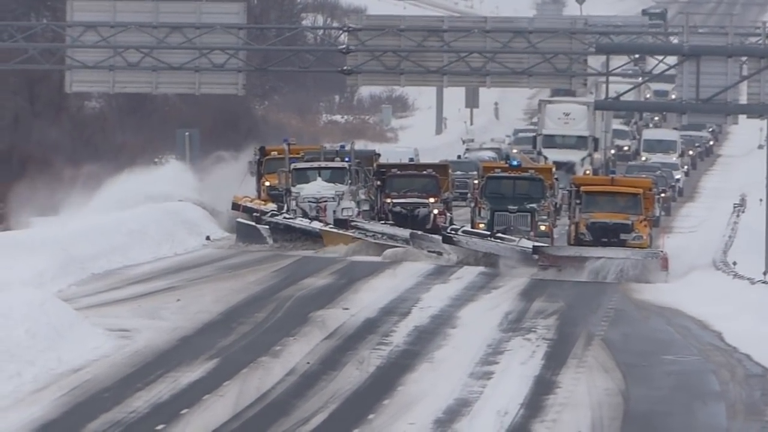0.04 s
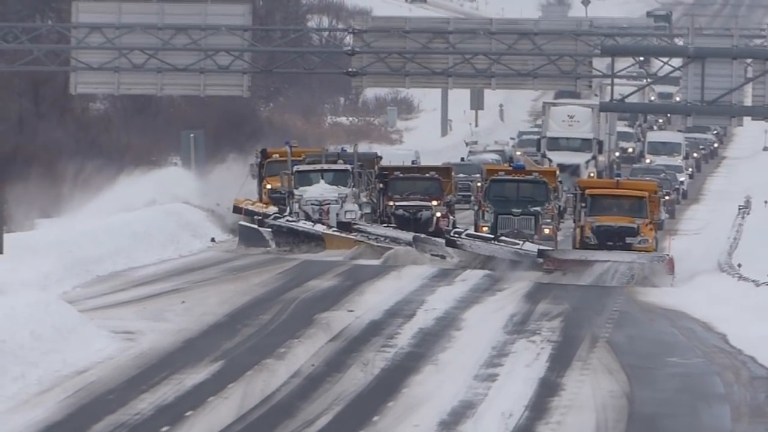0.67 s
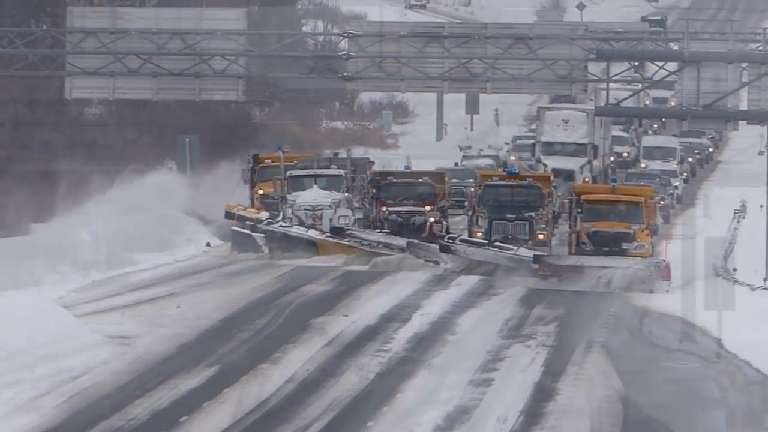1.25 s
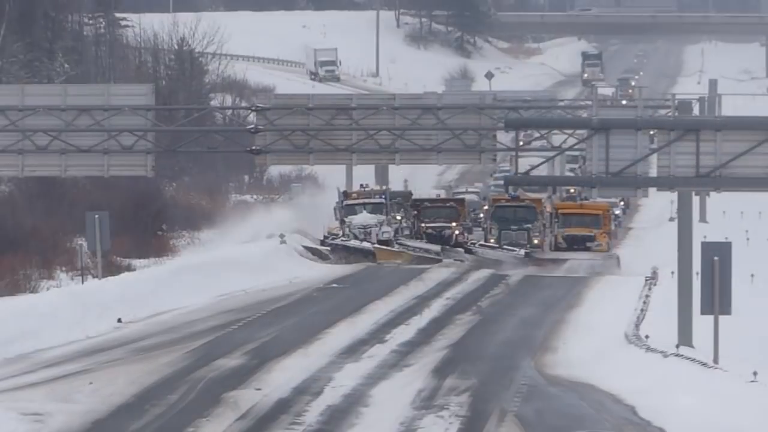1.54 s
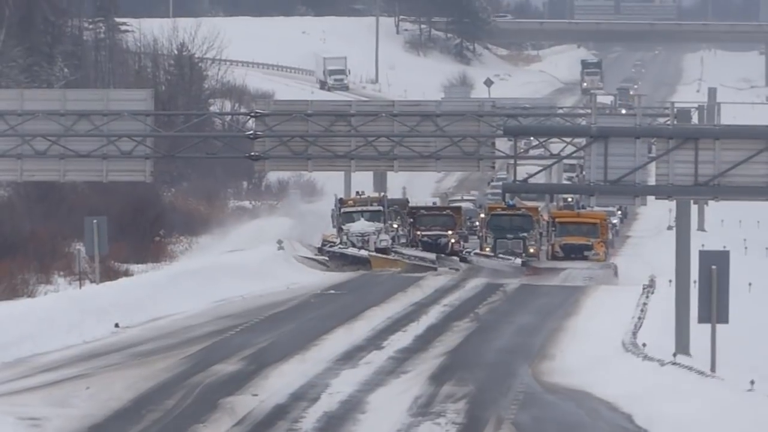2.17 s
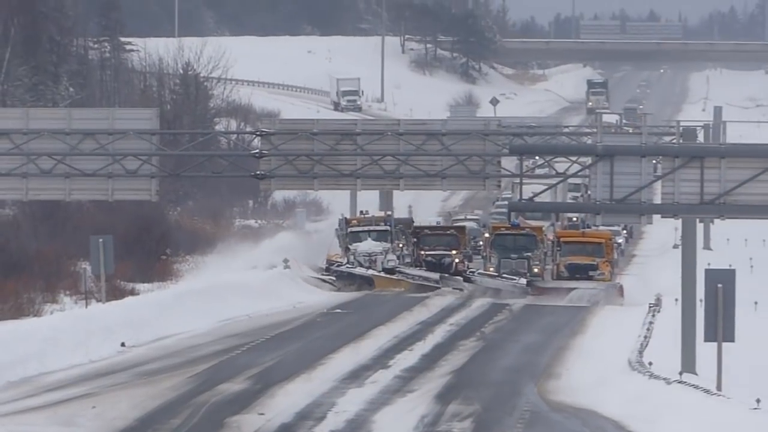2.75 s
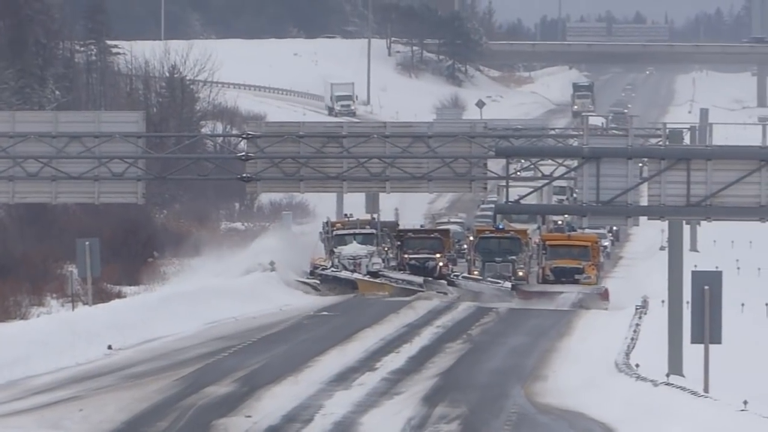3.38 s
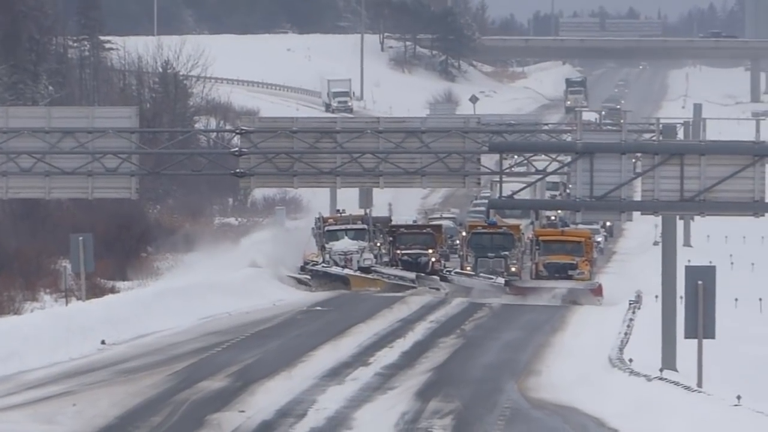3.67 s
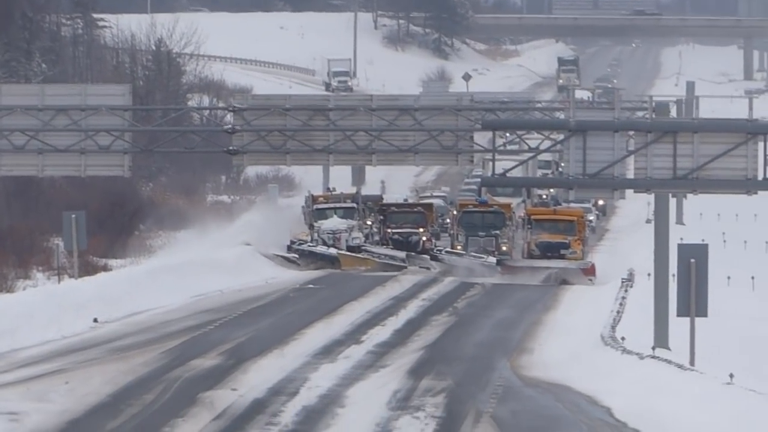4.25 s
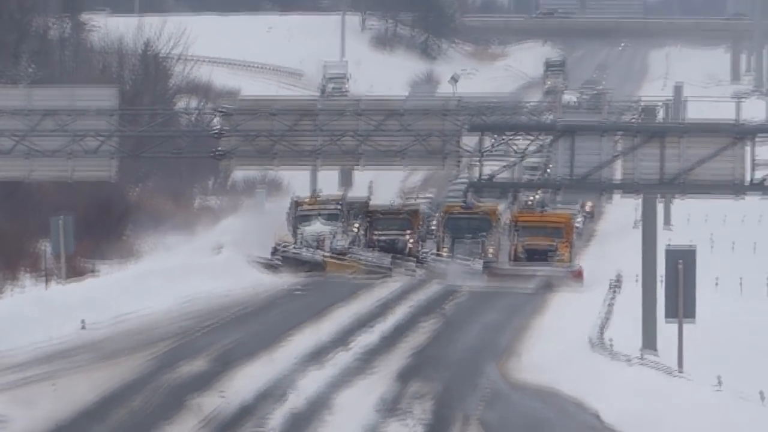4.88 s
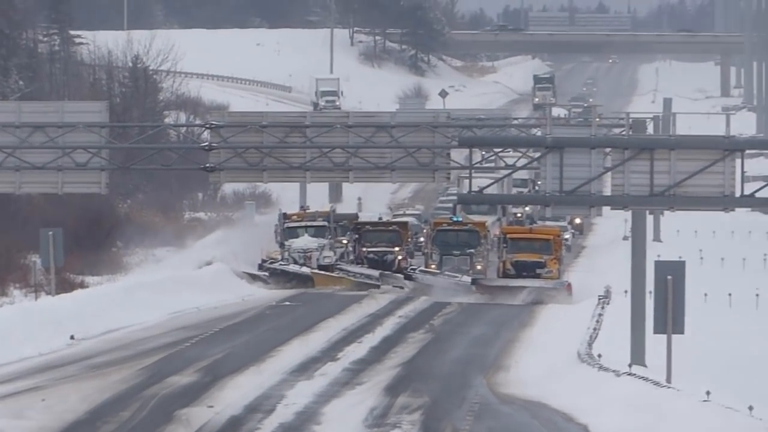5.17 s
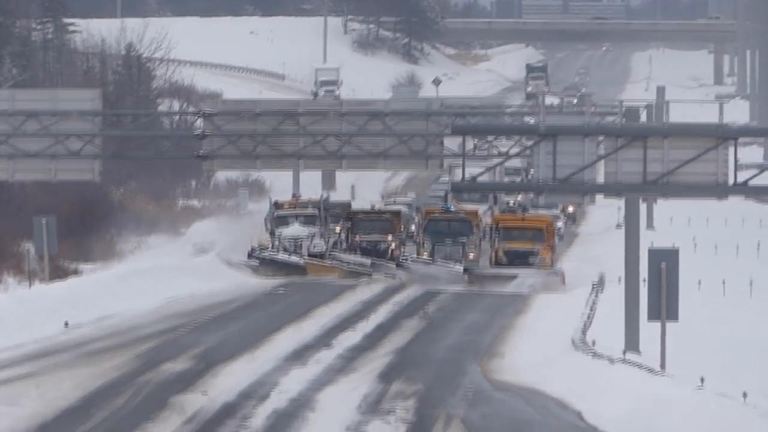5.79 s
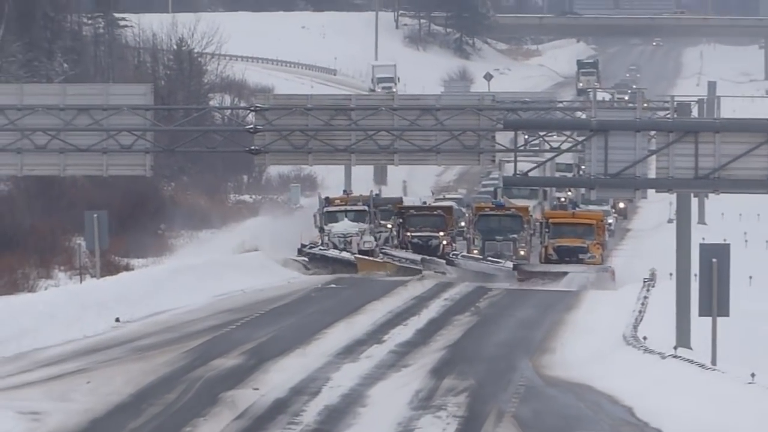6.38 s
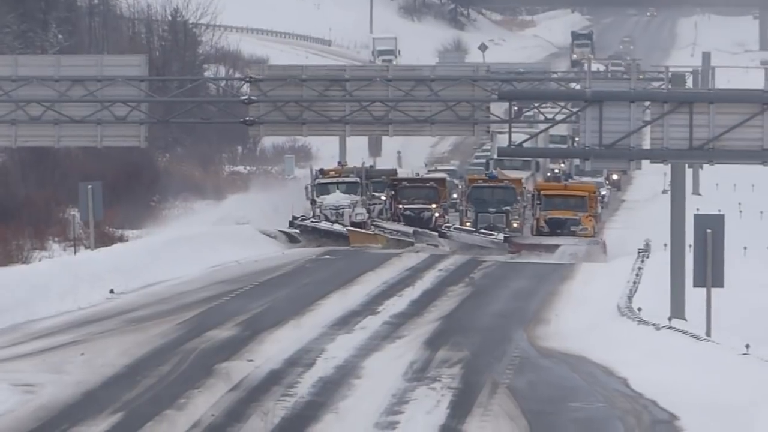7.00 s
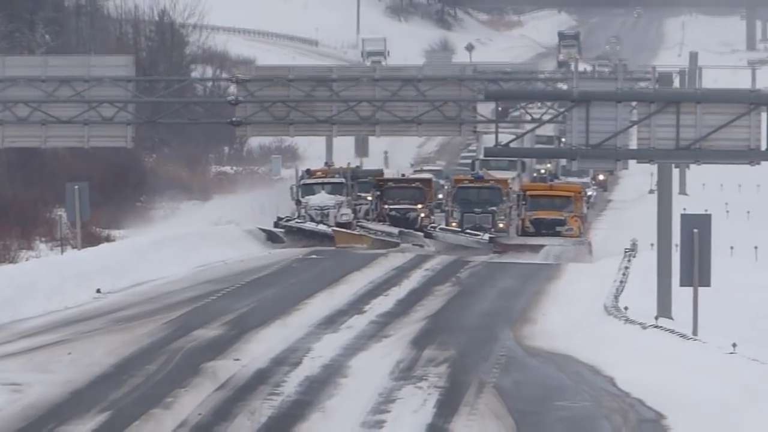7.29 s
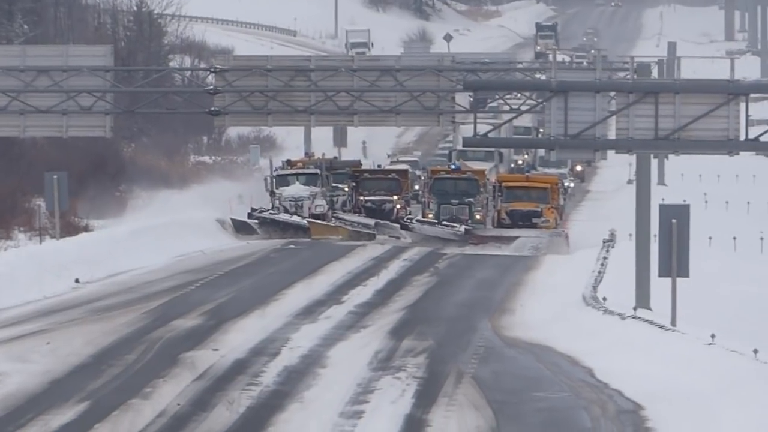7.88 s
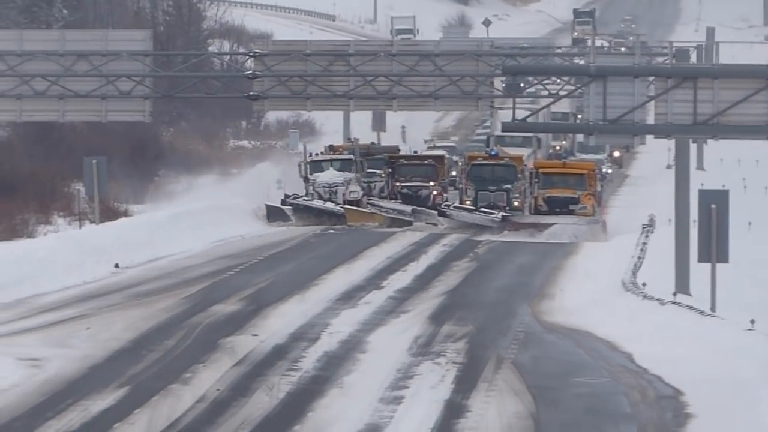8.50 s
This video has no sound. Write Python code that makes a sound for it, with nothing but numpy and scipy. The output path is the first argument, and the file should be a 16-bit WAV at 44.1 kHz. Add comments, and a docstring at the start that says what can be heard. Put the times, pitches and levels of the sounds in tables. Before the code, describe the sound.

Low, fluttering wind buffets a microphone outdoors by a highway, rasping and crackling in the stronger gusts and dropping out in short lulls. Before it sets in, far-off snowploughs are heard briefly, engines roaring and blades scraping the road, followed by a short rush, with quick electrical clicks over both. Faint distant traffic carries on under the wind, which eases near the end.

```python
"""A diesel roar and the scrape of blades come first: far-off snowploughs creeping along a winter highway. Sharp
ticks dot these first two seconds, while the roar gives way to a brighter rush. The road then falls back behind
gusty wind. Eddies buffet the microphone with low, fluttering pressure, and in the hardest gusts the flow tears
into a rasp and a crackle. Distant traffic and a faint hiss lie beneath."""
import sys
import numpy as np
from scipy import signal
from scipy.fft import rfft, irfft, next_fast_len
from scipy.io import wavfile
from scipy.ndimage import uniform_filter1d

SR = 44100
rng = np.random.default_rng(int(sys.argv[2]) if len(sys.argv) > 2 else 0)


def waveform_to_disk(signal):
    """Save audio, clipped to [-1, 1], as 16-bit WAV at the path in sys.argv[1]."""
    frames = np.transpose(np.atleast_2d(signal))
    scaled = np.clip(frames, -1, 1) * 32767
    samples = np.round(scaled).astype(np.int16)
    wavfile.write(sys.argv[1], SR, samples)


N = 381024
TIME = np.arange(N) / SR

# The ploughs' loudness. Each row: time in seconds, relative levels of roar and of blade scrape in dB.
PLOUGH_LEVELS = [(0.0, -26, -35), (0.02, -26, -34), (0.594, -24, -32), (0.676, -23.5, -36.5),
                 (0.834, -23.5, -31), (0.882, -23, -38), (1.032, -28.5, -40), (1.22, -25, -35)]
# Loudness of the rush, first gust, breeze and far traffic. Each row: time in seconds, relative level in dB.
RUSH_LEVELS = [(1.24, -39), (1.37, -37), (1.52, -40), (1.8, -37), (1.84, -41.5), (2.04, -39.5)]
FIRST_GUST_LEVELS = [(1.2, -34), (1.248, -23), (1.358, -37.5), (1.418, -21.5), (1.552, -34), (1.588, -23),
                     (1.728, -30), (1.85, -27)]
BREEZE_LEVELS = [(1.8, -24), (2.6, -26.5), (3.35, -28.5), (4.3, -31), (4.6, -28), (5.35, -29), (6.0, -29),
                 (6.12, -33), (7.1, -26), (7.6, -32), (8.15, -36), (8.3, -39), (8.64, -37)]
TRAFFIC_LEVELS = [(2.06, -46.5), (2.5, -53.5), (2.8, -47), (3.3, -54), (3.88, -44.5), (4.05, -50.5),
                  (4.5, -48), (5.0, -52.5), (6.6, -54), (7.0, -65.5), (8.33, -52), (8.64, -57.5)]
# Engine and blade resonances. Each row: centre in Hz, width in Hz, relative level in dB.
PLOUGH_MODES = [(117, 34, -45), (151, 19, -45.5), (371, 22, -33), (441, 22, -35.5), (975, 37, -40.5)]
TRAFFIC_MODES = [(134, 26, 5), (246, 22, 7.5), (450, 13, 2), (683, 20, 3.5), (2460, 25, -14.5)]
# Gusts. Each row: start in seconds, length in seconds, relative levels of pressure and of torn air in dB.
GUST_EVENTS = [(1.8, 0.18, -19.5, -74), (1.94, 0.12, -23, -66), (2.15, 0.07, -22.5, -51),
               (2.198, 0.096, -22.5, -42.5), (2.352, 0.082, -22, -46), (2.436, 0.11, -24.5, -47.5),
               (2.628, 0.051, -22, -67), (2.694, 0.055, -21, -54), (2.838, 0.16, -23, -59),
               (2.947, 0.098, -22, -38.5), (3.096, 0.061, -22, -43), (3.178, 0.13, -26, -55),
               (3.412, 0.17, -23, -76), (3.634, 0.033, -35.5, -60), (3.94, 0.084, -23.5, -79),
               (4.06, 0.048, -27.5, -75), (4.152, 0.064, -24, -74), (4.418, 0.019, -26.5, -80),
               (4.625, 0.084, -22.5, -67), (4.712, 0.15, -22.5, -50), (4.892, 0.22, -22.5, -41),
               (5.156, 0.14, -24.0, -61.5), (5.47, 0.075, -21.5, -60), (5.567, 0.032, -20.5, -68),
               (5.685, 0.014, -25.5, -71), (5.802, 0.11, -22.0, -54), (5.91, 0.08, -20.5, -42.5),
               (6.198, 0.078, -25.5, -59), (6.338, 0.016, -20, -61), (6.376, 0.081, -25.0, -60),
               (6.514, 0.19, -26, -63.5), (6.635, 0.13, -21.5, -48), (6.781, 0.11, -32, -53),
               (6.881, 0.072, -25, -45.5), (6.96, 0.11, -27.5, -62), (7.076, 0.012, -18.5, -50),
               (7.18, 0.098, -22.5, -48.5), (7.34, 0.047, -25.5, -48.5), (7.435, 0.13, -24, -51),
               (7.709, 0.058, -27.0, -61), (7.821, 0.092, -29, -64), (8.039, 0.042, -25, -68),
               (8.34, 0.07, -46, -81), (8.476, 0.086, -30, -66), (8.543, 0.038, -22.5, -64)]
# Drops in the breeze. Each row: start in seconds, length in seconds, dip in dB.
BREEZE_LULLS = [(2.1, 0.033, -7), (2.792, .055, -9.5), (3.308, 0.042, -6), (3.672, .265, -19.5),
                (4.115, .03, -16), (4.372, 0.095, -12.5), (5.29, 0.042, -9), (5.609, 0.069, -32),
                (5.715, 0.043, -11), (6.055, 0.045, -9), (7.296, 0.018, -7.5), (7.781, 0.034, -18),
                (7.963, 0.058, -10), (8.181, 0.15, -22), (8.407, 0.04, -11)]
# Slow, deep eddies. Each row: start in seconds, length in seconds, relative level in dB.
DEEP_EDDIES = [(.33, 0.1, -37), (.5, .05, -51), (.61, 0.1, -34.5), (.76, .16, -47), (.98, .08, -66),
               (1.245, .045, -38), (1.33, .72, -42)]
# Hard single eddies, spits of torn air, loud ticks and far blade scrapes.
# Each row: start in seconds, relative peak in dB.
HARD_EDDIES = [(1.811, -15), (1.879, -11), (1.904, -21), (2.065, -12), (2.142, -14.5), (2.351, -18),
               (2.66, -16), (2.711, -17), (2.963, -19.5), (3.628, -21), (3.945, -18), (4.431, -22.5),
               (4.668, -14), (4.752, -17), (5.488, -16), (6.339, -21), (6.734, -18.5), (6.793, -23),
               (6.907, -18), (7.756, -22), (7.829, -21)]
AIR_SPITS = [(2.2288, -24), (2.249, -33), (2.284, -40), (2.7377, -32), (3.034, -35), (3.146, -33),
             (3.235, -34), (4.1998, -35), (4.722, -30), (4.9876, -31), (5.0515, -30), (5.853, -38),
             (5.9774, -33), (6.2302, -35.5)]
LOUD_TICKS = [(0.0489, -37), (0.3407, -31), (0.6325, -27), (0.6738, -34), (0.7157, -28.5), (0.7991, -33),
              (0.8409, -41), (0.8828, -36), (1.007, -41), (1.0493, -33.5), (1.133, -35), (1.2159, -35),
              (1.299, -31.5), (1.3409, -39), (1.3832, -29.5), (1.5494, -31.5), (1.674, -38), (1.7993, -36)]
FAR_SCRAPES = [(2.59, -50), (2.79, -52), (3.36, -53), (3.72, -54), (8.17, -72)]
# How the wind differs between the two microphone ports. Each row: time in seconds, side-to-mid gain in dB.
WIND_WIDTH = [(1.8, -11), (2.05, -7.5), (2.23, -55.5), (2.55, -70), (2.9, -45.5), (3.9, -28.5),
              (4.8, -27.5), (7.0, -20), (8.6, -18)]
# Noise spectra of the sources. Each row: frequency in Hz, relative spectral density in dB.
ROAR_SPECTRUM = [(40, -41), (70, -27), (115, -8), (160, -9), (200, -10), (280, -2.5), (380, -0.5),
                 (520, -1.5), (680, -4), (850, -12.5), (1500, -17), (8000, -95)]
SCRAPE_SPECTRUM = [(150, -43), (600, -21), (1000, 5.5), (1300, 2), (1700, 2.5), (2200, -3.5), (2800, -10),
                   (3800, -18), (5200, -19), (6000, -34), (7500, -56), (15000, -75)]
RUSH_SPECTRUM = [(100, -25), (250, 4.5), (400, 13), (700, 6), (1000, 2.5), (1500, -1), (2300, -6),
                 (3100, -10.5), (4000, -18.5), (5000, -21.5), (7500, -42.5), (10500, -44.5), (15000, -65)]
WIND_SPECTRUM = [(30, -46), (55, -33.5), (85, -20.5), (130, -4.5), (200, 1.5), (300, 4), (450, 2),
                 (650, -4.5), (900, -11.5), (1400, -23.5), (2400, -34.5), (4000, -51), (14000, -110)]
TEAR_SPECTRUM = [(150, -25.5), (600, -0.5), (1300, 18), (2200, 8), (3500, 4.5), (5000, -6.5), (7500, -19),
                 (11000, -25), (13000, -42), (16000, -54.5)]
RUMBLE_SPECTRUM = [(25, -12), (45, -8), (70, 11), (110, 9.5), (180, -6), (400, -45), (3000, -110)]
FIRST_GUST_SPECTRUM = [(60, -41), (100, -2), (150, 7), (220, 4.5), (320, 1), (600, -13.5), (6000, -87)]
TRAFFIC_SPECTRUM = [(40, -23), (70, -11), (105, 4.5), (150, 10), (240, 16.5), (400, 4.5), (700, 12),
                    (1100, 9), (1700, 2.5), (2500, 4), (3500, -7), (7500, -35.5), (15000, -59)]
FAR_SCRAPE_SPECTRUM = [(500, -20), (1400, -8.5), (2700, 5), (4000, -5.5), (6000, -22), (12000, -60)]
HISS_SPECTRUM = [(3000, -14.5), (7500, -8.5), (10000, 3.5), (12000, -4), (16000, -11)]

RUSH_START_S, RUSH_END_S = 1.236, 2.05


def from_db(db):
    """Amplitude grows tenfold for every 20 dB."""
    return 10 ** (np.asarray(db) / 20)


def in_time(rows):
    """Linear interpolation gives each column of a curve at every sample."""
    times, *columns = np.transpose(rows)
    return [np.interp(TIME, times, column) for column in columns]


def between(start, end, fade):
    """A trapezoidal window opens from start to end; all times are in seconds."""
    return np.clip(np.minimum(TIME - start, end - TIME) / fade + .5, 0, 1)


def bursts(events, rise_s, decay_s):
    """Transient envelopes swell and decay exponentially; their amplitudes add."""
    envelope = np.zeros(N)
    age = TIME[:SR // 4]
    shape = (1 - np.exp(-(age / rise_s) ** 2)) * np.exp(-age / decay_s)
    for start, db in events:
        at = int(start * SR)
        envelope[at:at + len(age)] += from_db(db) * shape[:N - at] / shape.max()
    return envelope


def held(events, attack_s, release_s):
    """Envelopes rise, hold and die away; as with incoherent sources, their powers add."""
    power = np.full(N, 1e-14)
    for start, length, db in events:
        span = slice(int(start * SR), int((start + length + .5) * SR))
        age = TIME[span] - start
        shape = (1 - np.exp(-(age / attack_s) ** 2)) * np.exp(-np.maximum(age - length, 0) / release_s)
        power[span] += (from_db(db) * shape) ** 2
    return np.sqrt(power)


def rms_one(x):
    """Normalisation brings the mean power to one."""
    return x / np.sqrt(np.mean(x ** 2) + 1e-20)


def evened(x, span_s):
    """Division by the running rms steadies a noise, so that its envelope alone sets the level."""
    return x / np.sqrt(uniform_filter1d(np.mean(x ** 2, axis=0), int(span_s * SR)) + 1e-9)


def below(x, hz):
    """A zero-phase low-pass keeps the low band; subtracting it leaves the high band."""
    return signal.sosfiltfilt(signal.butter(2, hz, fs=SR, output="sos"), x)


def drift(hz):
    """Low-passed noise wanders at random with a spread of one."""
    step, settle = 20, 2000
    pole = np.exp(-2 * np.pi * hz * step / SR)
    white = rng.standard_normal(N // step + settle + 2)
    slow = signal.lfilter([1], [1, -2 * pole, pole * pole], white)[settle:]
    return np.interp(np.arange(N) / step, np.arange(len(slow)), rms_one(slow))


def noise(gain_at, side_db, alike_above_hz=1700):
    """Spectral shaping gives mid-side noise of unit rms whose channels differ most at low frequencies."""
    size = next_fast_len(N)
    hz = np.maximum(np.arange(size // 2 + 1) * SR / size, 1)
    spectra = rfft(rng.standard_normal((2, size))) * gain_at(hz)
    spectra[1] /= np.hypot(1, hz / alike_above_hz)
    mid, side = irfft(spectra, size)[:, :N]
    return rms_one(mid + from_db(side_db) * side * [[1], [-1]])


def coloured(spectrum, side_db):
    """Coloured noise follows a spectrum interpolated over log frequency."""
    points_hz, points_db = np.transpose(spectrum)
    return noise(lambda hz: from_db(np.interp(np.log(hz), np.log(points_hz), points_db)), side_db)


def drones(modes):
    """Engines at nearly the same speed beat together, blurring into narrow bands of noise."""
    def gain_at(hz):
        return np.sqrt(sum(from_db(db) ** 2 / width / (1 + ((hz - centre) / width) ** 2) ** 2
                           for centre, width, db in modes))
    total_power = sum(from_db(db) ** 2 for _, _, db in modes)
    return noise(gain_at, side_db=-45.5) * np.sqrt(total_power)


def ploughs():
    """Diesel roar and the friction of blades on the road make broadband noise with narrow resonances."""
    roar_db, scrape_db = in_time(PLOUGH_LEVELS)
    roar = from_db(roar_db - 1.5) * evened(coloured(ROAR_SPECTRUM, side_db=-27.5), span_s=0.052)
    scrape = from_db(scrape_db + 1.0 + 0.99 * drift(25)) * coloured(SCRAPE_SPECTRUM, side_db=-23.0)
    return (roar + scrape + drones(PLOUGH_MODES)) * between(-1, RUSH_START_S, fade=0.03)


def road_rush():
    """The road's rush starts bright and dulls as its treble decays exponentially."""
    level_db = in_time(RUSH_LEVELS)[0] + 14.5 + 1.3 * drift(23)
    rush = from_db(level_db) * coloured(RUSH_SPECTRUM, side_db=-11)
    dull = below(rush, hz=2400)
    treble_db = 3.5 - 10.5 * (TIME - RUSH_START_S)
    return (dull + from_db(treble_db) * (rush - dull)) * between(RUSH_START_S, RUSH_END_S, fade=.005)


def turbulence():
    """Turbulent flow at the microphone sets two envelopes: pressure, and the level of torn air in dB."""
    lull_db = sum(db * between(start, start + length, fade=0.025) for start, length, db in BREEZE_LULLS)
    breeze = from_db(in_time(BREEZE_LEVELS)[0] + lull_db + 2.5 * drift(18.2))
    gusts = held([(s, length, db) for s, length, db, _ in GUST_EVENTS], attack_s=0.0029, release_s=0.013)
    # The flow tears later than it buffets, and heals sooner.
    torn = held([(s, length, db) for s, length, _, db in GUST_EVENTS], attack_s=.028, release_s=0.008)
    flutter = drift(34)
    eddies = bursts(HARD_EDDIES, rise_s=0.0024, decay_s=0.0048)
    pressure = np.hypot(np.maximum(breeze, gusts) * from_db(2 * flutter), eddies)
    torn_db = 20 * np.log10(torn + from_db(-47.5) * breeze) + 1.86 * flutter
    return pressure, torn_db


def buffeting(pressure, torn_db):
    """Faster flow sheds smaller eddies: soft wind is deep, hard wind brighter and more ragged."""
    flow = evened(coloured(WIND_SPECTRUM, side_db=in_time(WIND_WIDTH)[0]), span_s=0.023)
    body, deep = below(flow, hz=580), below(flow, hz=240)
    hardness_db = np.clip(0.32 * (20 * np.log10(pressure) + 24) + 0.24 * (torn_db + 62.5), -12, 5)
    low = from_db(-.3 * hardness_db) * deep
    middle = body - deep
    high = from_db(hardness_db + 0.9 * drift(150)) * (flow - body)
    gusts = pressure * (low + middle + high) * between(1.78, 10, fade=0.064)
    microphone_bass_cut = signal.butter(3, 68, "high", fs=SR, output="sos")
    return signal.sosfilt(microphone_bass_cut, gusts)


def tearing(pressure, torn_db):
    """In the hardest gusts the flow breaks up into a rasp and a Poisson crackle of millisecond spits."""
    air = coloured(TEAR_SPECTRUM, side_db=in_time(WIND_WIDTH)[0] + 13.0)
    clumps = from_db(8.5 * drift(70) + 5.1 * drift(400))
    rasp = from_db(torn_db + 3.0) * evened(clumps * air, span_s=0.043)
    torn_share = 1 / (1 + from_db(1.4 * (-54.5 - torn_db)))   # gentle flow stays smooth
    grains_per_s = 380 * np.sqrt(torn_share) * np.minimum((pressure / from_db(-22.5)) ** 2, 2)
    onsets = rng.random(N) < grains_per_s / SR
    sizes = from_db(3.0 * np.clip(rng.standard_normal(N), -2, 2))
    grains = signal.oaconvolve(onsets * sizes, np.hanning(SR // 600), "same")
    crackle = from_db(-20.5) * pressure * torn_share ** 0.18 * grains
    spits = bursts(AIR_SPITS, rise_s=0.0012, decay_s=0.0024)
    return (rasp + (crackle + spits) * air) * between(2.08, 10, fade=0.0204)


def deep_wind():
    """Large eddies make slow pressure swings that thud on the microphone and build to the first gust."""
    rumble = evened(coloured(RUMBLE_SPECTRUM, side_db=-16), span_s=0.11)
    rumble *= from_db(0.5) * held(DEEP_EDDIES, attack_s=0.0061, release_s=0.018)
    gust = evened(coloured(FIRST_GUST_SPECTRUM, side_db=-8.5), span_s=0.046)
    gust *= from_db(in_time(FIRST_GUST_LEVELS)[0] + 4.5)
    return rumble * between(-1, 2.13, fade=.04) + gust * between(RUSH_START_S, 1.82, fade=0.013)


def sharp_ticks(first_s=.0489, per_s=12, count=25, corner_hz=900):
    """Impulses relax exponentially, alike in both channels; the faint ones keep a regular beat."""
    beats = first_s + np.arange(count) / per_s
    faint_db = -45 + 5 * np.clip(rng.standard_normal(count), -2, 2)
    spikes = np.full(N, 1e-18)
    for start, db in [*zip(beats, faint_db), *LOUD_TICKS]:
        spikes[int(start * SR)] = -from_db(db + 9.5)
    pole = np.exp(-2 * np.pi * corner_hz / SR)
    edge = signal.lfilter([1], [1, -pole], spikes)
    snap = signal.sosfilt(signal.butter(1, [1800, 4200], "band", fs=SR, output="sos"), edge)
    return edge + 1.8 * snap


def far_traffic():
    """Many tyres sum to a smooth noise, with faint engine tones and soft swells of blade friction."""
    tyres = from_db(3.5) * coloured(TRAFFIC_SPECTRUM, side_db=-37)
    engines = from_db(-11.0) * drones(TRAFFIC_MODES)
    scrapes = bursts(FAR_SCRAPES, rise_s=0.035, decay_s=.06) * coloured(FAR_SCRAPE_SPECTRUM, side_db=-33.5)
    level = from_db(in_time(TRAFFIC_LEVELS)[0] + .5 * drift(9.2))
    return level * (tyres + engines) * between(RUSH_END_S, 10, fade=.012) + scrapes


def microphone_hiss():
    """The noise floor is a faint, high hiss that steps up as the rush sets in."""
    level_db = -90.5 + 5.5 * between(RUSH_START_S, 10, fade=.02)
    return from_db(level_db) * coloured(HISS_SPECTRUM, side_db=-22.5)


def scene():
    """Road, wind, ticks and hiss add by superposition; one flow drives both buffeting and tearing."""
    pressure, torn_db = turbulence()
    road = ploughs() + road_rush() + far_traffic()
    wind = deep_wind() + buffeting(pressure, torn_db) + tearing(pressure, torn_db)
    return road + wind + sharp_ticks() + microphone_hiss()


def record(dry):
    """A steep elliptic low-pass limits the bandwidth."""
    cutoff_hz = 15900
    return signal.sosfilt(signal.ellip(10, .1, 90, cutoff_hz, fs=SR, output="sos"), dry)


dry = scene()
out = record(dry)
waveform_to_disk(out)
```